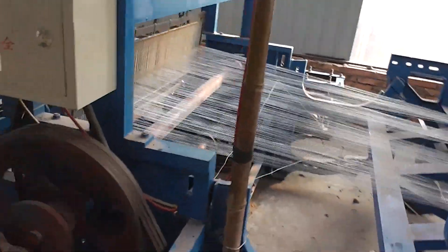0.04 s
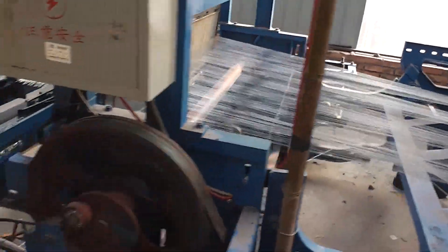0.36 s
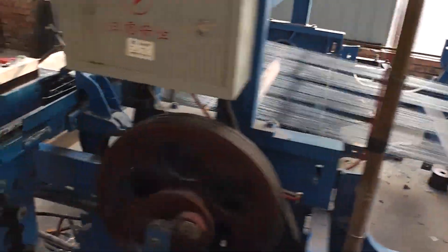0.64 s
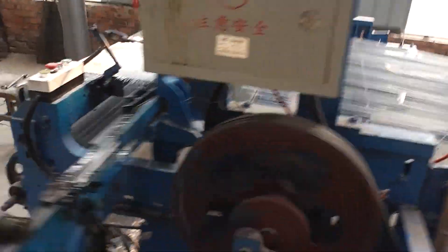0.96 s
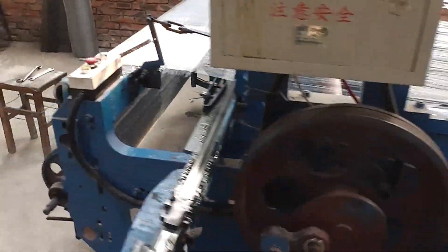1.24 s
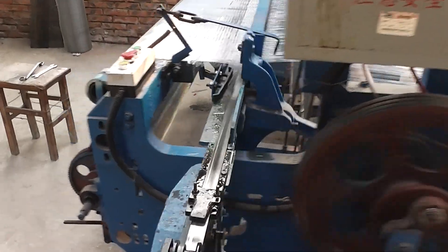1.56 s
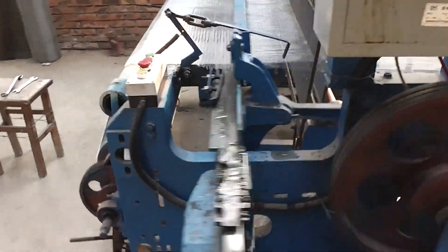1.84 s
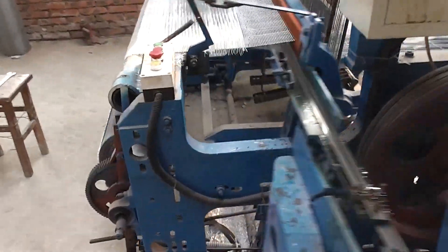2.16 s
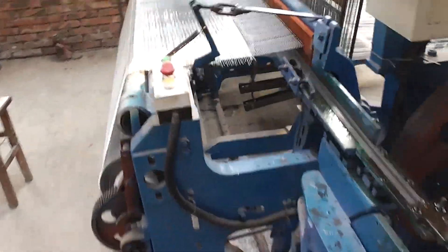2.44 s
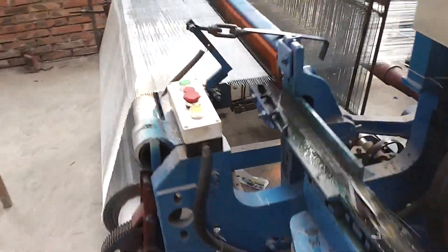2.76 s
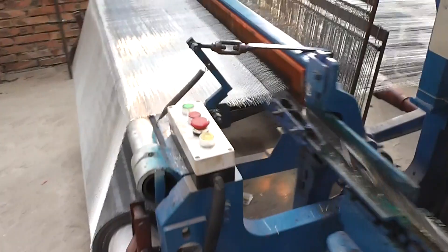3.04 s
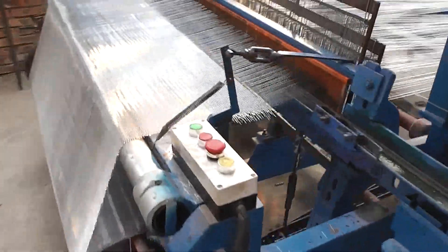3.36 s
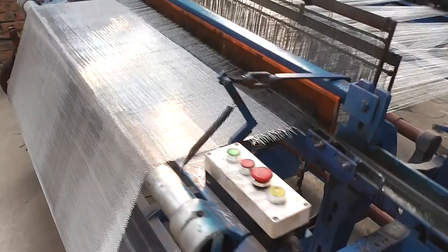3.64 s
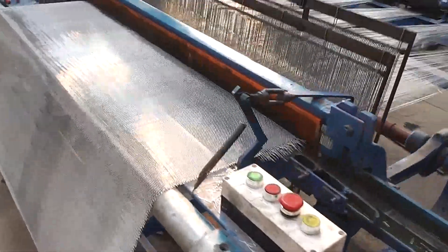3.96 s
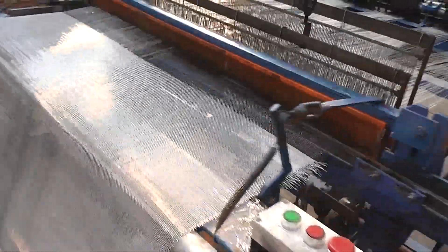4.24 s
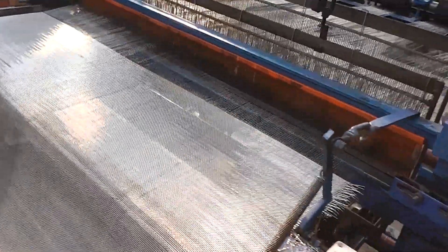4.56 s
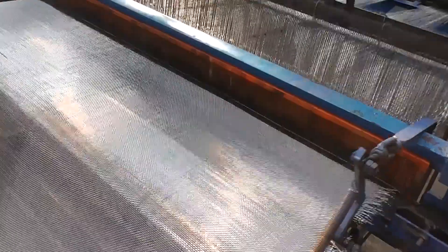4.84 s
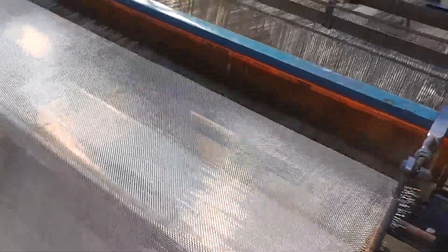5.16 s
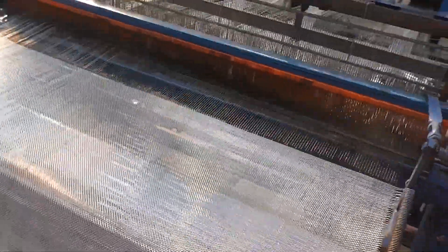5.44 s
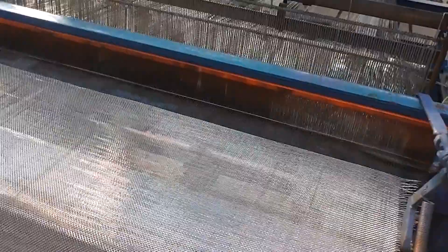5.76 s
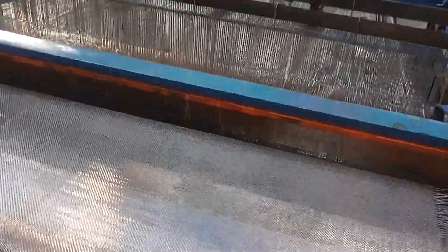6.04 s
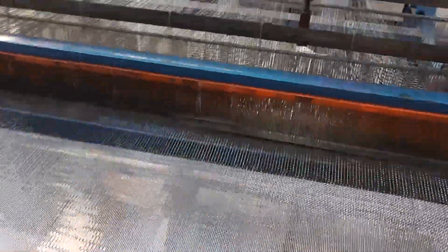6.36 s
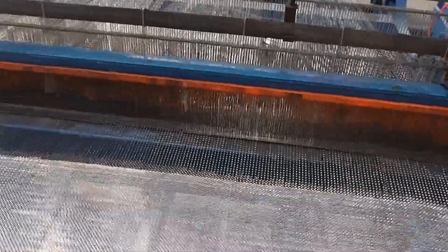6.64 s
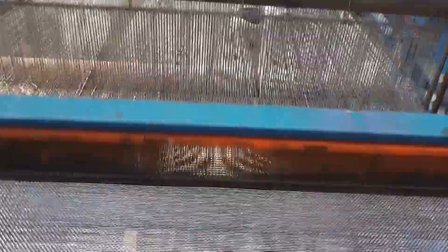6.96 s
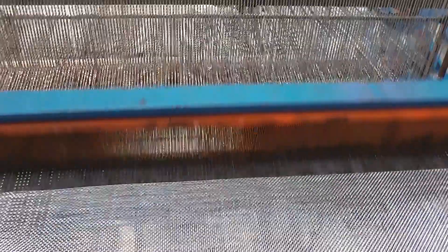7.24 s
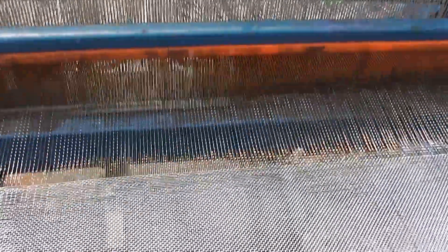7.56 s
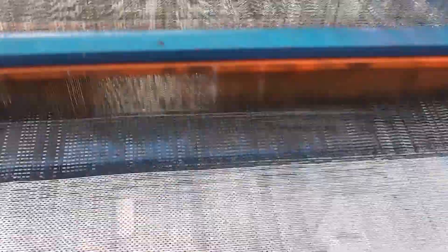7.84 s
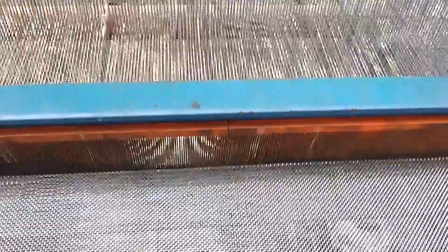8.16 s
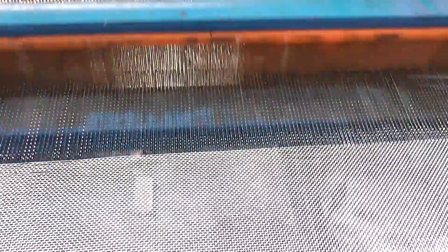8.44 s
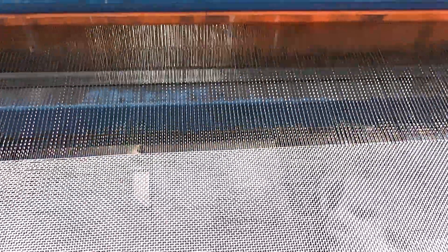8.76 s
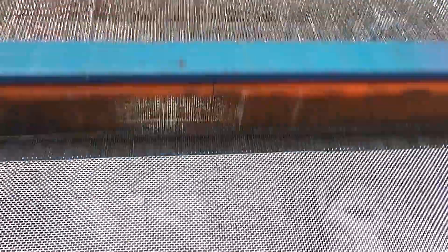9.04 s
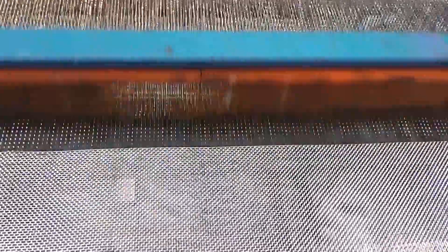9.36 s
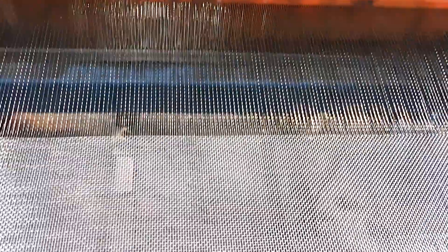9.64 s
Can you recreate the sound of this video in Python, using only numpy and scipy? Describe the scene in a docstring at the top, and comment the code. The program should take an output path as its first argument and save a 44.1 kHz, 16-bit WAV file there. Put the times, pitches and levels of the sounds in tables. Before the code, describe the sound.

A wire mesh loom runs loudly up close, steel clashing and rattling in a steady cycle over a rumbling motor and sizzling wires.

```python
"""A brick workshop, close to a running wire mesh loom, the stereo microphone walked from flywheel to cloth.
The drive rumbles, the iron frame roars, the gearing sings and warp wires sizzle through heddles and reed.
This din drops abruptly at each heavy blow, then swells again. Steel clashes on steel at the shed change,
the beat-up and the weft catch, each once in a pick of 1.06 s. Links and levers rattle between them, and
the walls answer the blows faintly."""
import sys
import numpy as np
from scipy import signal
from scipy.fft import rfft, irfft, next_fast_len
from scipy.io import wavfile
from scipy.ndimage import uniform_filter1d, map_coordinates

SR = 44100
rng = np.random.default_rng(int(sys.argv[2]) if len(sys.argv) > 2 else 0)


def inscribe(sig):
    """Save sig as 16-bit PCM at rate SR to the path in sys.argv[1].

    A 1-D sig is mono; a 2-D sig holds one channel per row.
    Samples are clipped to [-1, 1] before scaling.
    """
    pcm = np.round(np.clip(np.atleast_2d(sig).T, -1, 1) * 32767)
    wavfile.write(sys.argv[1], SR, pcm.astype(np.int16))


N = 436149
PICK_S, STEP_S = 1.0589, 0.025
GEAR_HZ, DEEP_HZ, TOP_HZ = 588.7, 120, 15950

# three swells of the din a pick, each cut off abruptly at a heavy blow; crests before trims:
# (cut-off [s], roar [dB], rumble [dB], sizzle [dB], fizz over sizzle [dB])
SWELLS = [(0.211, -20.5, -28.5, -26, -18), (0.53, -22.5, -33, -25.5, -13),
          (1.029, -13.5, -20.5, -19.5, -19), (1.29, -23.5, -33.0, -29.5, -10),
          (1.59, -17.5, -28.0, -19, -9), (2.094, -14.5, -24.0, -21.0, -23),
          (2.317, -25.5, -36.5, -31, -9.0), (2.641, -15, -26.5, -19, -8), (3.155, -22.5, -30.0, -28.5, -25),
          (3.391, -20.5, -29.5, -24.5, -12), (3.704, -18.5, -29.0, -21.5, -10),
          (4.198, -18, -25.5, -26, -20), (4.427, -19.5, -29, -23.0, -14.0),
          (4.76, -17.5, -27, -20.5, -12.0), (5.266, -18, -26, -23.5, -20),
          (5.497, -18.5, -27.0, -22, -13.0), (5.815, -16.5, -27.0, -19, -11.0),
          (6.324, -19.5, -27.5, -24, -16), (6.548, -20, -26.5, -24, -13.0), (6.877, -19.5, -27, -22, -12.0),
          (7.386, -16.5, -24.0, -21, -12), (7.606, -23.5, -30, -26, -13.0), (7.942, -22.5, -29.5, -23, -10),
          (8.447, -18.5, -24.5, -22.5, -13), (8.665, -23.5, -32, -28.5, -13.0),
          (8.995, -23.5, -32.0, -26, -10), (9.495, -16.5, -23.5, -20.5, -15), (9.73, -21.0, -27, -26, -12),
          (10.03, -24.5, -33, -26.0, -11.0)]
# how long the level stays low before each of the three swells, and holds at its crest: (duration [s])
LOW_S = [0.059, 0.079, 0.12]
HOLD_S = [0.019, 0.036, 0.017]
# how the level rises in each of the three swells: (first step up [dB], swell to the crest [dB])
ROAR_SHAPE = [(2, 4), (3.3, 6), (5.5, 9)]
RUMBLE_SHAPE = [(2.7, 6), (3.4, 7.3), (3.6, 13.5)]
SIZZLE_SHAPE = [(0.45, 0.92), (1, 8.75), (0.19, 11.2)]
# spectra of the drive, the iron frame, the wires and their finest fizz: (frequency [Hz], level [dB])
RUMBLE_TONE = [(20, -38), (45, -44), (70, -18.5), (100, -6.5), (140, -6.5), (180, 0), (240, 2.5),
               (310, 0.5), (420, 0.5), (520, -6.5), (800, -50)]
FRAME_TONE = [(250, -28.5), (420, -18), (510, -0.5), (600, 3), (720, 1.5), (900, -2), (1100, 0), (1220, 0),
              (1400, -2), (1750, -3), (2100, -7.5), (2600, -14.5), (3500, -15), (7000, -38)]
SIZZLE_TONE = [(1500, -8), (2500, -12.5), (3200, -6.5), (4000, 1.5), (4800, 2), (5700, 2.5), (7000, 1),
               (8800, -1), (10300, -3.5), (11500, -10), (13000, -23), (16000, -46)]
FIZZ_TONE = [(8000, -33), (10500, 2.5), (11700, 0.5), (13000, -3), (14200, -4), (15200, -11), (16000, -3.5)]
# the rumble's deep bass along the walk: (time [s], gain [dB])
DEEP_BASS = [(0, 0), (1, -6), (1.6, 6), (2.7, -4), (4, -1), (5, 2), (6.6, -3.5), (8, 1.5), (9.89, -2)]
# the gearing, loudest beside the flywheel: (time [s], note over roar [dB], overtone over roar [dB])
GEAR_SONG = [(0, -11, -15), (.6, -11.5, -11), (.8, -8, -17), (1.1, -9, -20), (1.48, -2.5, -14),
             (1.7, -13, -26), (2.5, -12, -11.5), (3.3, -19, -7.5), (4.5, -14, -19), (5.2, -19, -26)]
# gear teeth knocking through their backlash: (time [s], note [dB], overtone [dB])
BACKLASH = [(.74, -13, -38), (1.148, -14.5, -38), (1.403, -12, -24), (1.475, -19, -21), (1.55, -15, -36),
            (1.775, -22, -42), (2.02, -15, -27), (2.323, -23, -12.5), (2.47, -30, -18), (2.521, -10, -19),
            (3.36, -32, -27)]

# blows of heddle frames, reed and weft catch, then of links and levers striking out of turn:
# (time [s], level before trims [dB], relative knock [dB], crash t60 [s])
SHED_BLOWS = [(0.202, -5.5, -17, 0.08), (1.262, -6.5, -9, 0.16), (2.3211, -5.5, -3, 0.095),
              (3.3773, -7, -4, 0.053), (4.437, -8.5, 3.5, 0.074), (5.4984, -6.5, -6, 0.071),
              (6.5555, -7.5, 0.5, 0.11), (7.6123, -8.5, 2.5, 0.092), (8.6687, -9.5, -2, 0.076),
              (9.727, -8, -9, 0.076)]
BEAT_BLOWS = [(0.531, -6.5, -1.5, 0.073), (1.5858, -4, -4, 0.089), (2.646, -5, -13, 0.041),
              (3.7057, -8.5, -15, 0.088), (4.7614, -9, -18, 0.06), (5.821, -9, -23, 0.073),
              (6.8805, -6, -12, 0.053), (7.9454, -9, -13, 0.054), (8.9974, -10.5, -6, 0.12)]
CATCH_BLOWS = [(1.044, -3, -12, 0.036), (2.101, -1, -12, 0.026), (3.1613, -6.5, -16, 0.069),
               (4.219, -5.5, -20, 0.05), (5.278, -6, -17, 0.064), (6.335, -6.5, -15, 0.057),
               (7.3953, -7, -16, 0.033), (8.4556, -7, -15, 0.035), (9.513, -6.5, -17, 0.036)]
LINK_BLOWS = [(.487, -11, 8, 0.16), (1.211, -12, -13, 0.026), (1.2824, -8, -13, 0.066),
              (1.6297, -16, -19, 0.057), (3.678, -10, 13, 0.079), (3.714, -14, -15, 0.076),
              (4.186, -10, 10, 0.069), (4.3146, -9, -7, .041), (4.9925, -16, -9, .055),
              (5.118, -12, -3, .043), (5.199, -9, -12, 0.055), (6.2841, -7, -6, 0.17),
              (7.1561, -9.5, -5, 0.055), (7.3163, -9, -11, 0.039), (7.4969, -10.5, 0, .05),
              (8.363, -8.5, -7, 0.093), (9.243, -8, 5, 0.092), (9.2686, -7, -11, .05)]
LEVER_BLOWS = [(2.517, -7, -3, 0.076), (2.8614, -19, 5, .09), (3.143, -13, -1, 0.076),
               (3.3747, -18, -10, .083), (7.1164, -13.5, 11, 0.15)]
# the microphone's path by flywheel, corner and cloth, the last still ahead at the end: (time [s])
STATIONS_S = [2.9, 3.72, 11.5]
# blows that return in every pick: (time after the catch [s], level at the flywheel [dB],
# at the corner [dB], at the cloth [dB], relative knock [dB], crash t60 [s])
LINK_CYCLE = [(-.0195, -4.5, -5.5, -12, -1, 0.053), (.015, -44, -7, -11.5, -19, 0.043),
              (.325, -32, -6.5, -15, -7, .06), (.485, -24, -5, -10, 2, 0.11)]
LEVER_CYCLE = [(.6595, -28, -18, -10.5, -12, .15), (.8845, -22, -8, -4.5, 0, .08)]
# spectrum of each clash: (frequency [Hz], level [dB])
SHED_TONE = [(900, -14), (1800, -8), (3000, -8.5), (4700, -9.5), (5600, -1.5), (7800, -1), (8800, -1),
             (11700, -5.5), (14000, -12), (16000, -13)]
LINK_TONE = [(900, -18), (2000, -4), (3000, -7.5), (4400, -3), (7200, 2), (10700, -2), (13500, -10),
             (16000, -18)]
BEAT_TONE = [(900, -25), (2000, 0.5), (2900, -8), (4500, -0.5), (6200, -2), (7100, -2), (8900, 2),
             (10600, 0), (13000, -6), (16000, -14)]
CATCH_TONE = [(900, -28), (2000, -4), (3000, -15), (3700, 0.5), (4700, 1), (6300, -12), (8800, -3),
              (11300, 3), (13000, -11), (16000, -12)]
LEVER_TONE = [(500, -31), (900, 5.5), (1300, 3), (2000, 5), (2700, -7), (3600, -1.5), (5000, -12.5),
              (9000, -18), (16000, -29)]
# modes of the struck steel parts: (frequency [Hz], width [Hz], level [dB])
SHED_MODES = [(5700, 120, -10), (6550, 200, -4), (7400, 320, -2), (8400, 260, -10), (9000, 260, -2),
              (9500, 250, -4), (10300, 260, -3)]
LINK_MODES = [(7120, 320, 4.5), (8180, 88, -11), (10600, 150, -19), (11170, 290, 2)]
BEAT_MODES = [(4530, 140, 0), (7200, 160, -0.35), (9750, 65, -0.78), (10900, 42, -2)]
CATCH_MODES = [(4640, 89, -1), (5800, 90, 2), (8360, 200, -6), (10460, 200, -4), (11120, 290, -2.5)]
SPRING_MODES = [(4620, 55, -1), (5800, 70, -8)]
LEVER_MODES = [(1245, 20, -5), (1680, 36, -10), (1960, 41, -15), (2940, 27, -28), (3430, 35, -13),
               (4040, 21, -21)]

# the blows above about 12 kHz, brightest close to the open mechanism: (time [s], gain [dB])
GLINT = [(0, -5), (1.0, -6), (1.4, 6), (2.6, 2), (3.3, -1), (6, -2), (9.89, -3)]
# where the clatter sits along the walk: (time [s], left over right [dB], sway [dB])
PAN = [(0, 3.5, -1), (2.4, -2, .3), (4, -2.5, 1.3), (6, -1, 1.4), (7.8, -0.2, 2.3), (9.89, -0.5, 3)]
# likeness of the microphone's two channels: (frequency [Hz], correlation [-1 to 1])
MIC_CORRELATION = [(25, -0.19), (70, 1), (150, 1), (550, .96), (1200, 0.88), (2000, 0.76), (3000, 0.49),
                   (5000, 0.39), (7000, 0.56), (9000, 0.2), (11000, -0.28), (15000, 0.26)]
# decay between the brick walls: (frequency [Hz], t60 [s])
WALL_DECAY = [(200, .5), (2000, 0.48), (12000, 0.24)]


def amp(db):
    """Decibels to gain."""
    return 10 ** (np.asarray(db) / 20)


def unit(x):
    """Scaled to rms 1."""
    return x / np.sqrt(np.mean(x ** 2) + 1e-20)


def along(points, hz):
    """(frequency [Hz], value) points read on a log axis."""
    f, v = np.transpose(points)
    return np.interp(np.log(hz + 1), np.log(f + 1), v)


def curves(rows):
    """One value per sample for each column after the time."""
    times, *columns = np.transpose(rows)
    return [np.interp(np.arange(N) / SR, times, column) for column in columns]


def wobble(rate):
    """A smooth random curve, rate knots a second."""
    return map_coordinates(rng.standard_normal(N // 16), [np.arange(N) * rate / SR], mode="wrap")


def filtered(x, response):
    """x shaped by a gain that depends on frequency."""
    size = next_fast_len(N + 8192)
    return irfft(rfft(x, size) * response(np.fft.rfftfreq(size, 1 / SR)), size)[..., :N]


def shaken(tone, patchy_db, size=512):
    """A body's crowded modes at the microphone, rms 1, each patch swelling and fading by chance."""
    def mid_side_gains(hz):
        angle = np.arccos(np.clip(along(MIC_CORRELATION, hz), -1, 1)) / 2
        return amp(along(tone, hz)) * np.array([np.cos(angle), np.sin(angle)])

    spectra = signal.stft(rng.standard_normal((2, N)), nperseg=size)[2]
    patches = uniform_filter1d(rng.standard_normal(spectra.shape[1:]), size=3, axis=0)
    patches = uniform_filter1d(patches, size=8, axis=1)
    pair = signal.istft(spectra * amp(patchy_db * unit(patches)), nperseg=size)[1][:, :N]
    mid, side = filtered(pair, mid_side_gains)
    return unit(np.array([mid + side, mid - side]))


def chatter(rate, t60, share, spread_db):
    """Envelope, rms 1, of many small contacts dying in t60; share is their part of the power."""
    sizes = amp(spread_db * rng.uniform(-1, 1, N))
    contacts = (rng.random(N) < rate / SR) * sizes ** 2
    decay = amp(-60 * np.arange(SR // 8) / SR / t60)
    power = np.abs(signal.fftconvolve(contacts, decay ** 2)[:N])
    return np.sqrt(1 - share + share * power / power.mean())


def strikes(times, levels_db, t60s, attack):
    """Envelope of blows that rise with a time constant of attack seconds and die away."""
    t = np.arange(SR // 4) / SR
    out = np.zeros(N + SR)
    for s, db, t60 in np.broadcast(times, levels_db, t60s):
        out[round(s * SR):][:len(t)] += amp(db - 60 * t / t60) * (1 - np.exp(-t / attack))
    return out[:N]


def din_level(column, shape, fall_s, lag_s):
    """Level in dB: it drops at each heavy blow, stays low briefly, steps up, then swells to a crest."""
    cut, crest = np.array(SWELLS)[:, [0, column]].T
    kind = np.arange(len(cut)) % len(shape)
    step, swell = np.array(shape)[kind].T
    start = np.append(-STEP_S, cut[:-1])
    rising = start + np.array(LOW_S)[kind]
    crested = cut - np.array(HOLD_S)[kind]
    low = crest - swell - step
    times = np.column_stack([start + lag_s + fall_s, rising, rising + STEP_S, crested, cut + lag_s])
    levels = np.column_stack([low, low, crest - swell, crest, crest])
    return np.interp(np.arange(N) / SR, np.maximum.accumulate(times.ravel()), levels.ravel())


def roar_level():
    """The frame's roar in dB: it drops at each heavy blow and jumps slightly as the second lever bites."""
    since_catch = (np.arange(N) / SR - CATCH_BLOWS[1][0]) % PICK_S
    first, second = np.transpose(LEVER_CYCLE)[0]
    bite_db = np.interp(since_catch, [first, second, second + 0.0023, PICK_S], [0, -0.5, 0.5, 0])
    return din_level(1, ROAR_SHAPE, fall_s=0.019, lag_s=-0.0011) + bite_db


def sizzle_level():
    """The wires' sizzle in dB; it drops just after the roar."""
    return din_level(3, SIZZLE_SHAPE, fall_s=0.041, lag_s=0.0052)


def drive():
    """Motor and shafts rumble; play in the bearings hammers the iron frame, whose modes roar."""
    rumble_db = din_level(2, RUMBLE_SHAPE, fall_s=0.02, lag_s=-0.0068) + 0.03
    unsteady_db = wobble(22)
    rumble = amp(rumble_db + unsteady_db) * shaken(RUMBLE_TONE, patchy_db=1)
    deep = filtered(rumble, lambda hz: 1 / (1 + (hz / DEEP_HZ) ** 6))
    rumble += (amp(curves(DEEP_BASS)[0]) - 1) * deep
    roar = amp(roar_level() + unsteady_db) * shaken(FRAME_TONE, patchy_db=2, size=2048)
    return (rumble + roar) * chatter(rate=170, t60=0.045, share=0.27, spread_db=6.5)


def gearing():
    """Uneven tooth contact makes the housing sing, louder as the roar swells and at each knock."""
    note_db, overtone_db = curves(GEAR_SONG) + roar_level()
    times, *knocks_db = np.transpose(BACKLASH)
    note_knocks, overtone_knocks = [strikes(times, db, t60s=0.16, attack=0.004) for db in knocks_db]
    wander = 1 + 0.01125 * wobble(25) + 0.0236 * wobble(140)
    phase = 2 * np.pi * GEAR_HZ * np.cumsum(wander) / SR
    # note and overtone each stutter at random
    note = unit(amp(3 * wobble(45)) * np.sin(phase))
    overtone = unit(amp(4.3 * wobble(45)) * np.sin(2.05 * phase))
    return (amp(note_db) + note_knocks) * note + (amp(overtone_db) + overtone_knocks) * overtone


def warp():
    """Hundreds of wires tick and scrape in the heddles and the reed."""
    cut, *_, swell_fizz_db = np.transpose(SWELLS)
    swell = np.searchsorted(cut[:-1], np.arange(N) / SR)
    fizz_db = uniform_filter1d(swell_fizz_db[swell], size=2048) + 3
    sizzle_db = sizzle_level() + 1.5 * wobble(20) - 1.38
    sizzle = amp(sizzle_db) * shaken(SIZZLE_TONE, patchy_db=1.1, size=1024)
    fizz = amp(sizzle_db + fizz_db) * shaken(FIZZ_TONE, patchy_db=2.4)
    return (sizzle + fizz) * chatter(rate=400, t60=0.015, share=0.35, spread_db=10)


def plucked_wires(count, t60):
    """Now and then one warp wire is plucked and tinkles on its own pitch."""
    when, pitch, size = rng.random((count, 3)).T
    levels_db = sizzle_level()[(when * (N - 1)).astype(int)] - 6.5 + 6 * size
    t = np.arange(SR // 6) / SR
    out = np.zeros((2, N + SR))
    for start, hz, db in zip(when * N, 4000 * 2.6 ** pitch, levels_db):
        phase = rng.uniform(0, 2 * np.pi, (2, 1))
        out[:, int(start):][:, :len(t)] += amp(db - 60 * t / t60) * np.sin(2 * np.pi * hz * t + phase)
    return out[:, :N]


def ringing(times, levels_db, t60s, modes):
    """Every blow rings the part's modes at new strengths, each detuned in proportion to its width."""
    hz, width, mode_db = np.transpose(modes)[:, :, None]
    t = np.arange(SR // 6) / SR
    out = np.zeros((2, N + SR))
    for s, db, t60 in np.broadcast(times, levels_db, t60s):
        detune, strength = rng.standard_normal((2, len(modes), 1))
        phase = rng.uniform(0, 2 * np.pi, (2, len(modes), 1))
        struck_hz = hz + 0.334 * width * detune
        partials = amp(mode_db + 2 * strength) * np.sin(2 * np.pi * struck_hz * t + phase)
        out[:, round(s * SR):][:, :len(t)] += partials.sum(axis=1) * amp(db - 60 * t / t60)
    return out[:, :N]


def clash(blows, tone, modes, crack_db, crash_db, ring_db, knock_db, ring_life, attack=0.0016):
    """Steel on steel: a crack at contact, a buzzing crash, the part's ring, a knock through the frame."""
    times, db, frame_db, t60 = np.transpose(blows)
    crack = strikes(times, db + crack_db, t60s=0.012, attack=0.0001)
    # the parts chatter against each other as the crash dies
    crash = strikes(times, db + crash_db, t60, attack)
    crash *= chatter(rate=500, t60=0.0086, share=0.59, spread_db=0)
    # the heavy frame takes the blow at once and damps it quickly
    frame = shaken(FRAME_TONE, patchy_db=1)
    knock = strikes(times, db + frame_db + knock_db, 0.6 * t60, attack=0.00033) * frame
    contact = (crack + crash) * shaken(tone, patchy_db=2)
    return contact + ringing(times, db + ring_db, t60 * ring_life, modes) + knock


def each_pick(cycle, scatter_db):
    """Blows that return in every pick, their level set by where the microphone stands."""
    blows = []
    for catch_s, *_ in CATCH_BLOWS:
        for delay, *station_db, knock_db, t60 in cycle:
            s = catch_s + delay
            if s < N / SR:
                db = np.interp(s, STATIONS_S, station_db) + scatter_db * rng.standard_normal()
                blows.append((s, db, knock_db, t60))
    return blows


def shed_change():
    """The heddle frames clash as they change the shed."""
    return clash(SHED_BLOWS, SHED_TONE, SHED_MODES,
                 crack_db=-9, crash_db=-4.5, ring_db=-22, knock_db=-7, ring_life=1.1)


def links(tick_count):
    """Links and weft carrier rattle; slack links also tick at random, louder as the sizzle swells."""
    when, size = rng.random((tick_count, 2)).T
    ticks_db = sizzle_level()[(when * (N - 1)).astype(int)] + 8 + 5 * size
    ticks = [(s, db, -9, 0.063) for s, db in zip(when * N / SR, ticks_db)]  # columns as LINK_BLOWS
    blows = np.vstack([each_pick(LINK_CYCLE, scatter_db=0.8), LINK_BLOWS, ticks])
    return clash(blows, LINK_TONE, LINK_MODES,
                 crack_db=-10.5, crash_db=-7.5, ring_db=-24, knock_db=-11, ring_life=1.4, attack=0.002)


def beat_up():
    """The reed beats the weft wire up into the cloth."""
    return clash(BEAT_BLOWS, BEAT_TONE, BEAT_MODES,
                 crack_db=-14, crash_db=-4, ring_db=-25, knock_db=-5, ring_life=0.88)


def weft_catch():
    """The catch snaps home and its spring pings, louder as the microphone nears the cloth side."""
    snap = clash(CATCH_BLOWS, CATCH_TONE, CATCH_MODES,
                 crack_db=-9, crash_db=-5.5, ring_db=-19.5, knock_db=-14, ring_life=1)
    times = np.transpose(CATCH_BLOWS)[0]
    ping_db = np.interp(times, [3, 7], [-26, -14])
    return snap + ringing(times + 0.0012, ping_db, t60s=0.041, modes=SPRING_MODES)


def levers():
    """Two levers take up their play with a hollow clank, louder toward the cloth, at times out of turn."""
    blows = np.vstack([each_pick(LEVER_CYCLE, scatter_db=1.36), LEVER_BLOWS])
    return clash(blows, LEVER_TONE, LEVER_MODES,
                 crack_db=-16, crash_db=-8, ring_db=-14, knock_db=-14, ring_life=2, attack=0.00061)


def brick_walls(x):
    """The walls' answer at the microphone; the treble dies first."""
    hz, t, spectra = signal.stft(rng.standard_normal((2, SR // 2)), SR, nperseg=256)
    decay = amp(-60 * t / along(WALL_DECAY, hz)[:, None])
    tail = signal.istft(spectra * decay, SR, nperseg=256)[1]
    return signal.fftconvolve(x, tail / np.linalg.norm(tail[0]), axes=1)[:, :N]


def clatter_pan():
    """Left and right gains: the clatter shifts with the walk and crosses the loom twice a pick."""
    walk_db, sway_db = curves(PAN)
    sway = np.cos(2 * np.pi * (np.arange(N) / SR - 0.25) / (PICK_S / 2))
    balance_db = walk_db + sway_db * sway
    return amp([balance_db / 2, -balance_db / 2])


def scene():
    """The loom from close by: blows and wires move across the microphone, the low din stays central."""
    blows = shed_change() + links(tick_count=30) + beat_up() + weft_catch() + levers()
    top = filtered(blows, lambda hz: np.clip((hz - 10500) / 3000, 0, 1))
    blows += (amp(curves(GLINT)[0]) - 1) * top
    wires = warp() + plucked_wires(count=70, t60=0.14)
    return clatter_pan() * (blows + wires) + amp(-24) * brick_walls(blows) + drive() + gearing()


def record(dry):
    """The microphone chain rounds peaks softly, thins the bass below 40 Hz and cuts off at TOP_HZ."""
    rounded = dry / (1 + np.abs(dry / 0.85) ** 6) ** (1 / 6)
    return filtered(rounded, lambda hz: (hz < TOP_HZ) * hz / np.hypot(hz, 40))


dry = scene()
out = record(dry)
inscribe(out)
```